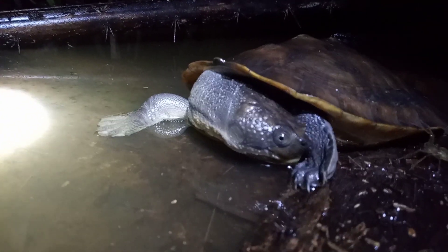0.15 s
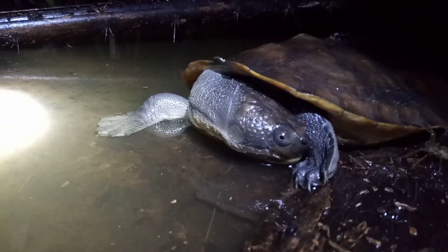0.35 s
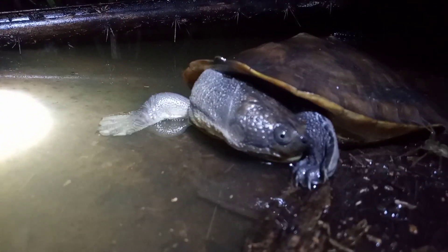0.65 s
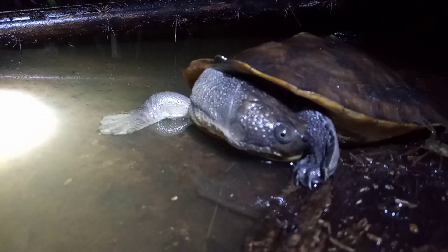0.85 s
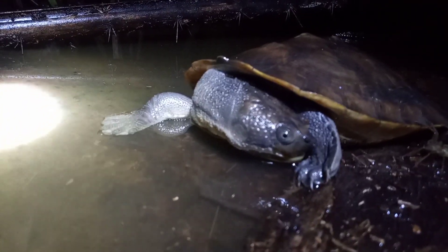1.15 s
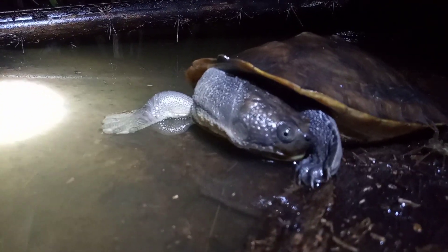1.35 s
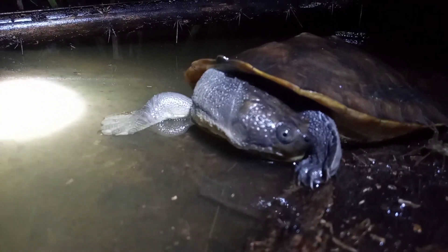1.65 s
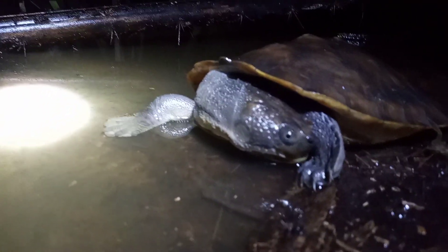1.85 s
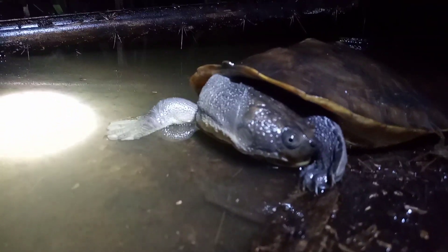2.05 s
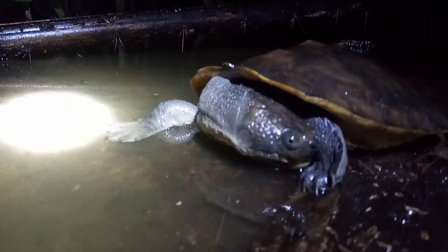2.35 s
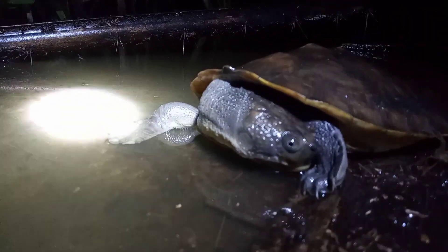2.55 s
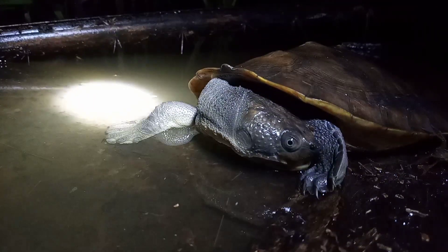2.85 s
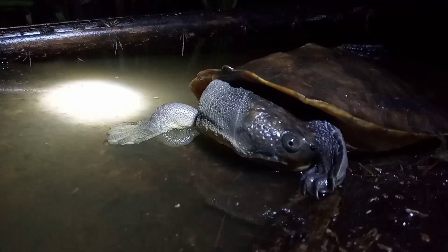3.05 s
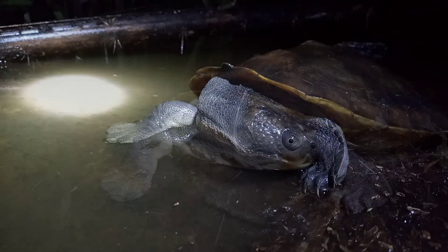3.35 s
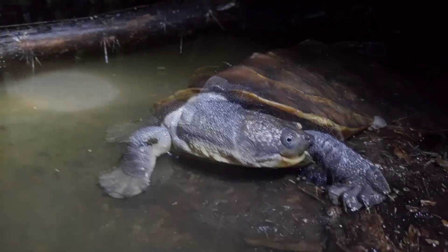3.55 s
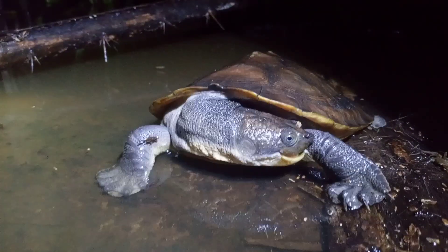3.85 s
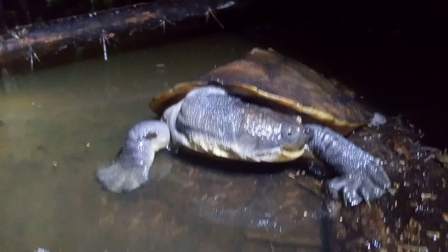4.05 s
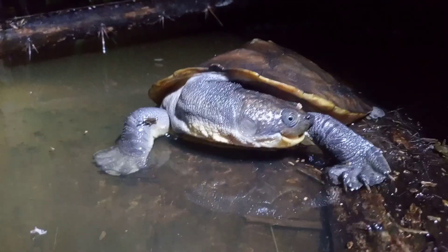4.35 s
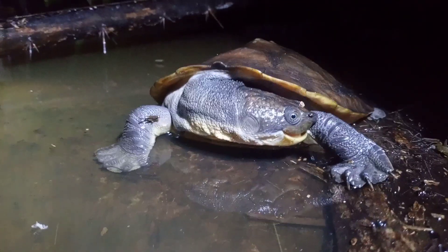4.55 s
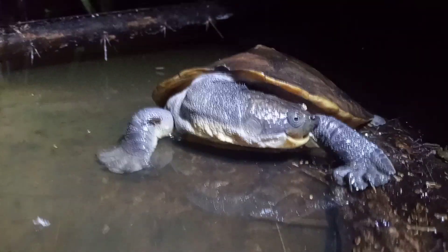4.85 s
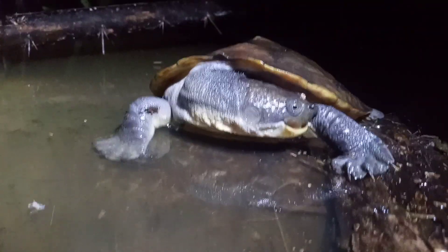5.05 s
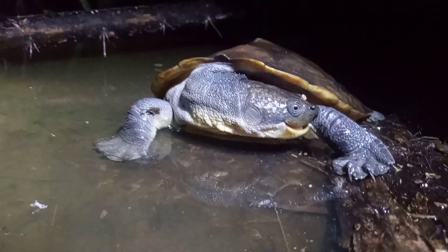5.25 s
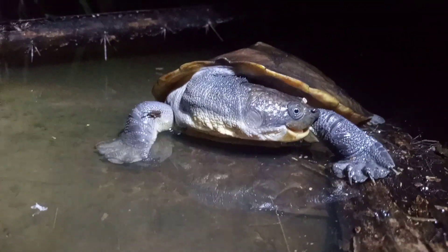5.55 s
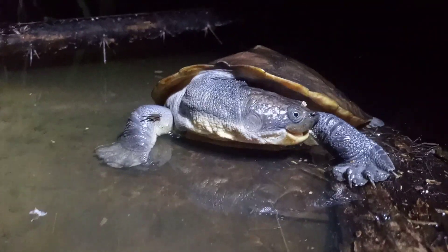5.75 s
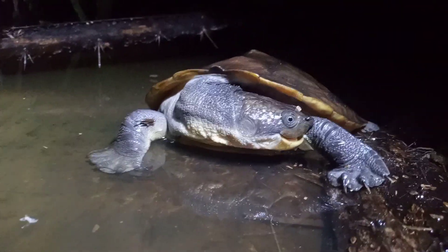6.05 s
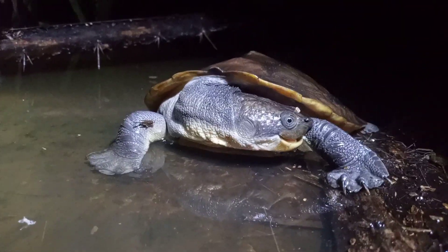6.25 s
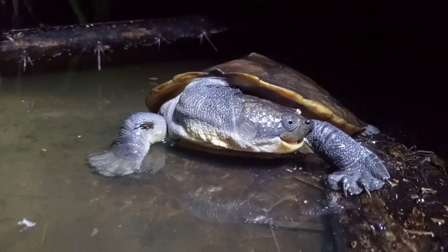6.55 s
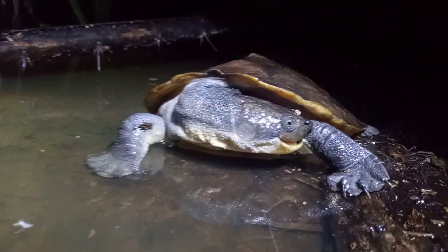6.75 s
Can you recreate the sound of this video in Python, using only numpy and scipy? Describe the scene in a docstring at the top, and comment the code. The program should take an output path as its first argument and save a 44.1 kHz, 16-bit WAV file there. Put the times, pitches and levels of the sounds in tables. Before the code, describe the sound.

A night swamp, heard mostly on the left. Crickets drone high and steadily over a murmur of far frogs and faint low air. A nearby frog gives short, gritty notes that tighten into whistles, in pairs and a cluster near the middle. Rough rasps answer, water plops and twigs tick. Past five seconds a close, loud snap cracks, followed by a burst of rasps. Trees echo softly around a handheld microphone.

```python
"""A swamp at night. A whistling frog, mostly to the left, is mid-note at the start: clicks and noise tighten
into a tone. Crickets drone, far frogs murmur, low air rumbles and a faint bush cricket buzz swells in bouts,
all shaped noise or tones. Trains of pips and chirps soon join, twigs tick as tiny noise bursts, water plops as
rising tones and sloshes as noise. Harsh pulsed rasps answer from half a second; from one second, scuffs of
noise and low thumps bump the camera. After five seconds one close snap ducks the camera's limiter; a much
weaker echo of it follows. Trees echo most sounds."""
import sys
import numpy as np
from scipy import signal
from scipy.fft import rfft, irfft, next_fast_len
from scipy.io import wavfile
from scipy.ndimage import uniform_filter1d, minimum_filter1d, map_coordinates

SR = 44100
rng = np.random.default_rng(int(sys.argv[2]) if len(sys.argv) > 2 else 0)


def log_audio(samples):
    """Write samples as a 16-bit WAV file to the path given in sys.argv[1]."""
    # one column per channel
    frames = np.atleast_2d(samples).T
    # limit to full scale, then quantise
    limited = np.clip(frames, -1, 1)
    pcm = np.round(limited * 32767).astype(np.int16)
    wavfile.write(sys.argv[1], SR, pcm)


N = 304290
T = np.arange(N) / SR  # time of each sample [s]

# Levels in the tables are starting points; each source may add its own gain.
# Whistling frogs: (start [s], length [s], top pitch, an octave under the whistle [Hz], whistle level [dB],
# rising body level [dB], grate level [dB], overtone level [dB], echo level [dB])
WHISTLE_NOTES = [(-.09, 0.15, 1323, -42, -44, -50.5, -69, 3),
                 (0.15, .15, 1318, -37.5, -43.5, -44.5, -56, 3.5),
                 (1.153, 0.14, 1305, -39.5, -48, -50.5, -66, 3),
                 (1.53, 0.17, 1368, -36.5, -48, -65, -70, -2),
                 (3.455, 0.13, 1243, -37, -40, -39.5, -47.5, 3.5),
                 (3.703, 0.15, 1282, -35, -35, -38, -44.5, 1),
                 (4.022, 0.12, 1251, -29, -36, -37, -41.5, -2.5),
                 (4.758, 0.13, 1374, -45.5, -41.5, -66, -53, 4),
                 (5.004, 0.16, 1326, -34, -41, -43.5, -52, 6.5),
                 (5.37, .165, 1328, -30.5, -39.5, -43, -51, 0),
                 (6.442, 0.12, 1337, -44.5, -63, -73, -72, 7), (6.756, 0.16, 1333, -40.5, -50, -55, -53, 6)]
# Partials around the whistle: (multiple of the base pitch, level [dB])
WHISTLE_PARTIALS = [(1, -3), (3, 0), (4, -2), (5, 6)]
# Colour of the grating start of a whistle note: (frequency [Hz], relative level [dB])
GRATE_COLOUR = [(500, -66), (850, -32), (1040, -5.5), (1240, 3.5), (1550, -2), (1750, -3), (1950, 3.5),
                (2250, -7.5), (2700, -29), (3300, -17), (4000, -28), (9000, -56.5)]
# Colour of the brighter part of its body: (frequency [Hz], relative level [dB])
BRIGHT_COLOUR = [(700, -33), (1050, -34), (1260, -7), (1600, -28), (2050, -11), (2400, 1.5), (2850, -5),
                 (3300, -11), (4200, -17.5), (4900, -12), (5500, -19), (6200, -5.5), (9000, -87)]
# Murmur of the far frogs: (time [s], level [dB])
FAR_FROG_LEVEL = [(0, -49.5), (.5, -48), (1.1, -49), (1.8, -50.5), (2.0, -51), (2.7, -50.5), (3.4, -52.5),
                  (4.0, -55.5), (4.6, -57.5), (5.6, -48), (6.15, -49), (6.4, -55), (6.75, -69)]
# Colour of that murmur: (frequency [Hz], relative level [dB])
FAR_FROG_COLOUR = [(1100, -31.5), (1450, -16), (1640, -9), (1850, -19.5), (2080, -4.5), (2250, 7.5),
                   (2480, 1), (2750, -3.5), (3050, -14.5), (3500, -13), (4200, -26), (4650, -31),
                   (5000, -17), (5500, -30), (7000, -61.5)]
# Cricket drone: (time [s], level [dB])
DRONE_LEVEL = [(0.0, -46), (2.86, -45.5), (3.57, -49), (4.28, -47), (5.48, -47), (5.82, -46), (6.9, -46)]
# Colour of the far crickets: (frequency [Hz], relative level [dB])
CRICKET_COLOUR = [(3000, -28.5), (5400, -32.5), (6100, -13.5), (6400, -4.5), (6650, -6.5), (7000, 2.5),
                  (7350, 0.5), (7800, -2.5), (8100, -2.5), (8800, -7.5), (9300, -4), (9800, -10),
                  (10600, -41), (14000, -85.5)]
# Left-right balance of the crickets: (frequency [Hz], right minus left [dB])
CRICKET_BALANCE = [(5000, -3.5), (6000, -19), (7600, -22.5), (8400, -30), (9300, -4.5), (11000, -22)]
# Night air: (time [s], level [dB])
AIR_LEVEL = [(0, -64), (1.3, -69), (2.8, -69), (3.4, -76), (4.4, -73.5), (6.9, -73)]
# Colour of the air: (frequency [Hz], relative level [dB])
AIR_COLOUR = [(20, -23), (45, -21.5), (68, -5), (99, 2.5), (125, 0), (150, -0.5), (230, -13.5), (600, -26),
              (850, -23.5), (1300, -25), (4000, -28), (12000, -73)]
# Bush cricket bouts: (full strength from [s], hold [s], level [dB], swell [s], fade [s])
BUZZ_BOUTS = [(0.104, 0.019, -58, 0.22, .07), (0.658, 0.079, -49.5, 0.18, 0.13),
              (1.617, 0.027, -42, 0.43, 0.13), (2.25, 0.093, -63.5, 0.63, 0.15),
              (2.656, 0.33, -38.5, 0.35, 0.91), (4.7, 1, -61, 0.56, 0.26), (5.904, 0.25, -35.5, 0.33, 0.17),
              (6.527, 0.33, -34.5, 0.17, .2)]
# Trilling frogs, then last a low, far layer of rasping frogs made the same way: (first call [s], stop [s],
# period [s], # call length [s], pips per second [1/s], middle pitch of a pip [Hz], level [dB])
TRILL_CALLS = [(0.09, 3.2, .343, 0.21, 60, 2290, -59.5), (3.87, 6.9, .362, 0.23, 38, 2250, -52.5),
               (0.3, 7.7, .35, 0.25, 70, 4755, -61.5), (0.5, 2.2, .41, 0.49, 27, 1640, -64.5)]
# Chirping crickets, a few runs of steady chirps, some overlapping: (first chirp [s], stop [s], period [s],
# middle pitch of a stroke [Hz], level [dB])
CRICKET_CHIRPS = [(.1, 3.4, 0.21, 7800, -50), (3.78, 6.1, 0.25, 7730, -50.5), (4.1, 5.1, 0.28, 7700, -50.5),
                  (5.24, 5.7, .235, 7600, -51)]
# Twigs and drips on litter: (time [s], pitch [Hz], level [dB])
LITTER_TICKS = [(0.137, 8900, -34), (.241, 3280, -38), (0.561, 2530, -31.5), (0.611, 11000, -41.5),
                (0.983, 3950, -32), (1.18, 14600, -30.5), (1.67, 5610, -34.5), (2.44, 7000, -32),
                (2.621, 11900, -30), (2.648, 4180, -29), (2.679, 4800, -30.5), (3.045, 2850, -37),
                (4.191, 10100, -34), (5.192, 13060, -30), (6.775, 10500, -27)]
# Colour of a tick: (multiple of its pitch, relative level [dB])
TICK_COLOUR = [(.1, -37), (.5, -10.5), (.9, -1), (1, 10.5), (1.1, -2), (1.7, -15), (4, -50)]
# A twig breaking close by: (time [s], peak level [dB])
TWIG_SNAPS = [(5.3051, 3), (5.3362, -22.5)]
# Colour of that snap: (frequency [Hz], relative level [dB])
SNAP_COLOUR = [(200, -40.5), (560, -14.5), (1100, -12), (1600, -28.5), (2200, -1.5), (2900, -1),
               (3600, -13.5), (5600, -12.5), (6150, 4), (6800, 2.5), (7600, -13.5), (9300, -14.5),
               (10500, -21), (13000, -32), (15500, -34)]
# Drops and bubbles: (time [s], starting pitch [Hz], level [dB], time to fall 60 dB [s])
WATER_PLOPS = [(.33, 417.5, -40, 0.11), (.472, 604, -53, 0.066), (.65, 486, -51.5, .08),
               (0.704, 530, -47.5, .11), (1.154, 437, -39.5, 0.041), (1.155, 624, -34.5, 0.029),
               (1.901, 493, -55.5, .2), (2.502, 692, -33, .07), (2.52, 600, -43, .08),
               (2.552, 425, -49, 0.061), (2.644, 635, -50, 0.045), (6.684, 850, -44.5, 0.053)]
# Water pushed aside: (time [s], level [dB], time to fall 60 dB [s])
WATER_SLOSHES = [(1.16, -59, 0.28), (1.879, -72, 0.62), (2.503, -48.5, 0.49), (2.64, -44.5, 0.083),
                 (2.99, -62.5, 0.6), (5.095, -68.5, 0.42), (5.5, -63.5, 0.54), (5.72, -68, 0.85),
                 (6.529, -63.5, 0.58), (6.7, -68, 0.25)]
# Colour of the spray: (frequency [Hz], relative level [dB])
SLOSH_COLOUR = [(150, -28), (400, -3), (700, 2), (1200, -5.5), (1800, 3), (3000, -8.5), (5000, -10),
                (12000, -45.5)]
# Rasping frogs: (start [s], length [s], final vocal sac pitch [Hz], level [dB], throat hum level [dB],
# opening croak relative to the rasp [dB])
RASP_NOTES = [(0.54, 0.16, 3480, -49, -56, 0), (0.856, 0.065, 2870, -46, -77, -8),
              (1.244, 0.1, 2810, -36.5, -45.5, -3), (1.771, 0.11, 3450, -49, -56, 0),
              (2.66, 0.085, 2730, -34.5, -43, -15), (2.979, 0.035, 2800, -45, -66, -8),
              (5.657, 0.068, 2880, -28.5, -61, 3.5), (5.714, 0.046, 3020, -31.5, -62, -7),
              (5.804, 0.099, 2870, -30, -49.5, 1), (6.051, 0.31, 3010, -51.5, -65, -1),
              (6.501, 0.094, 2750, -36, -48, -9)]
# Colour of the opening croak: (frequency [Hz], relative level [dB])
CROAK_COLOUR = [(600, -27), (1150, -33), (1400, 7), (1700, 10), (2500, 6.5), (3200, 6), (5000, -44),
                (12000, -82)]
# Colour of the rasp that follows: (frequency [Hz], relative level [dB])
RASP_COLOUR = [(600, -36), (1350, -28.5), (1650, -5), (1900, -10.5), (2200, -5.5), (2450, -4.5),
               (2700, -1.5), (3000, 1), (3270, 4), (3550, -10.5), (3800, -4), (4300, -15.5), (5600, -17.5),
               (7500, -15.5), (11000, -10), (16000, -18)]
# Soft knocks on the camera body: (start [s], scuff length [s], scuff level [dB], thump level [dB])
CAMERA_BUMPS = [(1.033, 0.16, -69, -65), (4.147, 0.027, -53, -52), (4.296, 0.019, -52, -60),
                (4.539, 0.029, -59.5, -69), (4.745, 0.024, -58.5, -53), (4.932, 0.039, -49, -40),
                (5.091, 0.044, -59, -57), (5.512, 0.06, -59, -48), (5.937, 0.039, -63, -55),
                (6.289, 0.026, -64, -53.5)]
# Colour of the scuff: (frequency [Hz], relative level [dB])
SCUFF_COLOUR = [(30, -41), (90, 10), (160, -0.5), (230, -14), (330, -0.5), (480, -19), (1200, -59),
                (4000, -76)]
# Long echo among the trees: (frequency [Hz], time to fall 60 dB [s])
TREE_ECHO = [(200, 0.6), (1200, 0.18), (2600, 0.55), (6000, 0.93), (15000, 0.26)]

# Whistle: where in the note its pitch peaks [share], and how fast it sags to either side
ARCH_TOP, ARCH_SAG = 0.66, 0.3003
# Vocal sac resonance: start and end [share of whistle pitch], rise [share of note], width [Hz]
BODY_START, BODY_END, BODY_RISE, BODY_WIDTH_HZ = 0.736, 0.92, 0.55, 420
PITCH_DB = -22  # base tone, relative to the whistle an octave above
CHORUS_SWAY_DB = 3  # slow sway of the far frogs
DRONE_DB = 3  # gain added to the cricket drone
THIN_HZ, THIN_DB = 6425, -16.5  # one thin, lower cricket note, and its level relative to the far crickets
SWELL_DB, LULL_DB = 21.5, -71.5  # depth of a swell or fade; faint buzz between bouts
# Pips: scatter of rate, fall and scatter of pitch [shares]; octave overtone [dB]
PIP_UNEVEN, PIP_FALL, PIP_ROUGH, OCTAVE_DB = 0.284, 0.087, 0.0245, -28
CHIRP_S, STROKES_PER_S = 0.087, 70.3  # chirp length; wing strokes each second
# Rasp resonance: start [share of its final pitch], width [Hz], level [dB]
SAC_START, SAC_WIDTH_HZ, SAC_DB = 0.75, 495, -8.5
HUM_HZ, HUM_WIDTH_HZ, HUM_T60 = 1650, 93, 0.49  # throat hum; last is time to fall 60 dB [s]
THUMP_HZ, THUMP_T60 = 94, 0.11  # the camera's low sway in the hand; time to fall 60 dB [s]
NEAR_LAG_S, FAR_LAG_S = 0.00127, 0.00063  # delay of the direct sound on the left
TOP_HZ = 15950  # nothing is kept from here up


def amp(db):
    """Turn decibels into a gain."""
    return 10 ** (np.asarray(db) / 20)


def unit(x):
    """Scale a sound to an average strength (rms) of 1."""
    return x / np.sqrt(np.mean(x ** 2) + 1e-20)


def along(points, hz):
    """Read (frequency, value) points on a log frequency axis."""
    f, v = np.transpose(points)
    return np.interp(np.log(hz + 1), np.log(f + 1), v)


def curves(rows):
    """Join timed points into one value per sample, for each column after the time."""
    s, *cols = np.transpose(rows)
    return [np.interp(T, s, c) for c in cols]


def wobble(rate, size=N):
    """Make a smooth random curve through this many random points a second."""
    points = rng.standard_normal(int(size * rate / SR) + 4)
    return map_coordinates(points, [np.arange(size) * rate / SR])


def filtered(x, gain):
    """Multiply a sound by a gain that depends on frequency."""
    n = x.shape[-1]
    m = next_fast_len(n + 8192)
    return irfft(rfft(x, m) * gain(np.fft.rfftfreq(m, 1 / SR)), m)[..., :n]


def coloured(x, spectrum):
    """Give a sound this tone colour, at rms 1, with a filter that rings only after its input."""
    order = 2048
    cepstrum = irfft(np.log(amp(along(spectrum, np.fft.rfftfreq(order, 1 / SR)))))
    # folding the log spectrum's transform forward leaves no ringing ahead of the sound
    cepstrum[1:order // 2] *= 2
    cepstrum[order // 2 + 1:] = 0
    ring = irfft(np.exp(rfft(cepstrum)))
    if x.ndim > 1:
        ring = np.atleast_2d(ring)
    return unit(signal.fftconvolve(x, ring, axes=-1)[..., :x.shape[-1]])


def patchy(x, patchy_db):
    """Give each frequency band its own slow swells and lulls."""
    bands = signal.stft(x, nperseg=512)[2]
    field = uniform_filter1d(rng.standard_normal(bands.shape), size=5, axis=0)
    field = uniform_filter1d(uniform_filter1d(field, size=22, axis=1), size=12, axis=1)
    return unit(signal.istft(bands * amp(patchy_db * unit(field)), nperseg=512)[1][:N])


def gliding(x, hz, width_hz):
    """Ring a sound through a resonance whose centre can move, at rms 1."""
    turn = np.exp(2j * np.pi * np.cumsum(hz) / SR)
    b, a = signal.butter(3, width_hz / 2, fs=SR)
    # shift the centre to zero, keep what is near it, and shift it back
    return unit((signal.lfilter(b, a, x / turn) * turn).real)


def add(track, s, sound):
    """Mix a sound into a track from time s on."""
    i = round(s * SR)
    part = sound[max(-i, 0):max(N - i, 0)]
    track[max(i, 0):][:len(part)] += part


def swell(u, rise, fall):
    """Fade smoothly in and out over u = 0..1; rise and fall are shares of that span."""
    fade_in = np.sin(np.pi / 2 * np.clip(u / rise, 0, 1))
    fade_out = np.sin(np.pi / 2 * np.clip((1 - u) / fall, 0, 1))
    return fade_in * fade_out


def among_trees(x, wet_db, right_db, lag_s=FAR_LAG_S):
    """Send a sound left and right, direct sound slightly later on the left, with quick scatter and a long tree echo."""
    echoes = rng.standard_normal((2, SR)) * amp(2 * wobble(400, size=SR))
    hz, t, bands = signal.stft(echoes, SR, nperseg=256)
    long_echo = amp(-60 * t / along(TREE_ECHO, hz)[:, None])  # from the trunks
    quick_scatter = 1.38 * amp(-60 * t / 0.033)  # from reeds and bank
    tail = signal.istft(bands * (long_echo + quick_scatter), SR, nperseg=256)[1]
    paths = amp(wet_db) * tail / np.linalg.norm(tail[0])
    paths[[0, 1], [round(lag_s * SR), 0]] += 1  # direct sound: left after the lag, right at once
    heard = signal.fftconvolve(x[None], paths, axes=1)[:, :N]
    return heard * amp([[0], [right_db]]) / np.sqrt(1 + amp(wet_db) ** 2)


def pulses(rate, jitter, breath):
    """Make uneven clicks of the vocal cords, each followed by a puff of noise."""
    phase = np.cumsum(rate * np.exp(jitter * wobble(200, size=len(rate)))) / SR
    clicks = np.diff(np.floor(phase), prepend=-1) * amp(1 * rng.standard_normal(len(rate)))
    puffs = np.exp(-4 * (phase % 1)) * rng.standard_normal(len(rate))
    return unit(clicks) + breath * unit(puffs)


def crack(spectrum, burst, ring_db, ring_t60):
    """Make a brief brittle noise burst with a short ring, at peak 1; times in seconds."""
    t = np.arange(SR // 20) / SR
    shape = t / burst * np.exp(1 / 2 - (t / burst) ** 2 / 2) + amp(ring_db - 60 * t / ring_t60)
    x = coloured(rng.standard_normal(len(t)) * shape, spectrum)
    return x / np.abs(x).max()


def whistling_frogs():
    """Quickening clicks grate through a vocal sac whose resonance rises, then give way to a firm, arching tone."""
    out = np.zeros((2, N))
    for s, length, pitch_hz, whistle_db, body_db, grate_db, overtone_db, echo_db in WHISTLE_NOTES:
        u = np.linspace(0, 1, int(length * SR))  # progress through the note
        rate = 170 + 110 * u  # clicks per second
        cords = pulses(rate, jitter=0.03, breath=0.25)
        # the throat spreads each click over most of a cycle
        cords = filtered(cords, lambda hz: np.exp(-1j * (hz / 640) ** 2 / (1 + hz / 9000)))

        sac_share = BODY_START + (BODY_END - BODY_START) * np.minimum(u / BODY_RISE, 1)
        body = gliding(cords, 2 * pitch_hz * sac_share, BODY_WIDTH_HZ) * swell(u / 0.74, 0.67, 0.54)
        grate = coloured(cords, GRATE_COLOUR) * swell(u / 0.72, 0.41, 0.38)
        bright = coloured(cords, BRIGHT_COLOUR) * swell((u - 0.2) / 0.6, 0.8, 0.37)

        arch = 1 - ARCH_SAG * np.maximum(u - ARCH_TOP, -0.33) ** 2
        glide = arch + 0.003 * wobble(160, size=len(u))
        phase = 2 * np.pi * np.cumsum(pitch_hz * glide) / SR
        # the pulses chop the young tone, less and less as the note tightens
        chop = 1 + (1 - u) ** 2 * np.cos(2 * np.pi * np.cumsum(rate) / SR)
        flutter = 0.35 * wobble(190, size=len(u))
        # weak notes never quite lock, and stay buzzy
        loose = np.clip((-26 - whistle_db) / 12, 0.2, 0.8)
        tone = np.sin(2 * (phase + loose * flutter)) + amp(PITCH_DB) * np.sin(phase)
        unsteady = amp((1 + 3 * loose) * wobble(170, size=len(u)))
        whistle = unit(tone * chop * unsteady) * swell(u, 0.65, 0.14) ** 2
        partials = sum(amp(db) * np.sin(round(k) * (phase + flutter)) for k, db in WHISTLE_PARTIALS)
        overtones = unit(partials) * chop * swell(u, 0.72, 0.3) ** 4

        note, edge = np.zeros(N), np.zeros(N)
        full_body = body + amp(-7.5) * bright
        add(note, s, amp(grate_db) * grate + amp(body_db) * full_body + amp(whistle_db) * whistle)
        add(edge, s, amp(overtone_db) * overtones)
        out += among_trees(note, wet_db=echo_db, right_db=-12.5, lag_s=NEAR_LAG_S)
        out += among_trees(edge, wet_db=echo_db - 3, right_db=-13.0, lag_s=NEAR_LAG_S)
    return out


def far_frogs():
    """Waver a band of patchy noise, like many distant calls overlapping into a murmur."""
    level_db, = curves(FAR_FROG_LEVEL)
    calls = patchy(rng.standard_normal(N), patchy_db=3) * amp(4.5 * wobble(70))
    murmur = among_trees(coloured(calls, FAR_FROG_COLOUR), wet_db=4.0, right_db=-22.5)
    return amp(level_db - 2.5 + CHORUS_SWAY_DB * wobble(7.5)) * murmur


def crickets():
    """Pulse twelve nearer crickets out of step over noise that stands for countless far ones."""
    level_db, = curves(DRONE_LEVEL)
    near = np.zeros(N)
    for pitch, speed, start, pace in rng.random((12, 4)):
        stroke_turns = (35 + 45 * speed) * T + start + 0.33 * wobble(6)
        strokes = np.maximum(np.sin(2 * np.pi * stroke_turns), 0)
        chirps = np.sin(np.pi * ((3 + 3 * pace) * T + start + 0.2 * wobble(2))) ** 4
        hz = 7000 + 620 * pitch + 90 * strokes + 50 * wobble(5)
        near += chirps * strokes * np.sin(2 * np.pi * np.cumsum(hz) / SR)
    thin = gliding(rng.standard_normal(N), np.full(N, THIN_HZ), width_hz=90)
    far = coloured(rng.standard_normal((2, N)), CRICKET_COLOUR)
    drone = far + 0.75 * unit(near) + amp(THIN_DB) * thin
    drone = filtered(drone, lambda hz: amp([0 * hz, along(CRICKET_BALANCE, hz)]))
    return amp(level_db + DRONE_DB + 0.35 * wobble(11)) * drone


def night_air():
    """Shape noise into a low, uneven rumble with a faint hiss above it."""
    level_db, = curves(AIR_LEVEL)
    shared = patchy(rng.standard_normal(N), patchy_db=2.0)  # the same on both sides
    air = coloured(shared + 1.0 * rng.standard_normal((2, N)), AIR_COLOUR)
    return amp(level_db + 3.5 + 2.63 * wobble(16)) * air * amp([[0], [-10]])


def bush_cricket():
    """Swell, hold and fade very high noise in bouts, throbbing with the wing strokes."""
    power = amp(LULL_DB) ** 2
    for s, hold, db, swell_s, fade_s in BUZZ_BOUTS:
        away = np.maximum(s - T, 0) / swell_s + np.maximum(T - s - hold, 0) / fade_s
        power = power + amp(db - SWELL_DB * away ** 2) ** 2
    wings = np.sin(2 * np.pi * np.cumsum(31 + 2.77 * wobble(3.1)) / SR)
    # (frequency [Hz], relative level [dB])
    buzz_colour = [(12500, -37.0), (14000, -20.5), (14700, 1.5), (15300, -1.0), (16000, -2.0)]
    buzz = coloured(rng.standard_normal((2, N)), buzz_colour)
    return np.sqrt(power) * amp(2.4 * wings) * buzz * amp([[0], [-8]])


def trilling_frogs():
    """Repeat trains of quick, rough pips in steady time, each pip falling in pitch, with an octave overtone."""
    out = np.zeros(N)
    for first, stop, period, length, pips_per_s, pitch_hz, db in TRILL_CALLS:
        u = np.linspace(0, 1, int(length * SR))
        for s in np.arange(first, stop, period):
            rate = pips_per_s * np.exp(PIP_UNEVEN * wobble(23.1, size=len(u)))
            pip = (np.cumsum(rate) / SR) % 1  # progress through each pip
            glide = 1 + PIP_FALL * (1 / 2 - pip) + PIP_ROUGH * wobble(399.6, size=len(u))
            phase = 2 * np.pi * np.cumsum(pitch_hz * glide) / SR
            tone = np.sin(phase) + amp(OCTAVE_DB) * np.sin(2 * phase)
            voice = unit(np.sin(np.pi * pip) ** 2 * tone)
            add(out, s, amp(db + 2 * rng.standard_normal()) * voice * swell(u, 0.036, 0.33))
    return among_trees(out, wet_db=7, right_db=-18.5)


def chirping_crickets():
    """Repeat short chirps in steady runs, some overlapping, each chirp made of wing strokes that sag in pitch."""
    out = np.zeros(N)
    u = np.linspace(0, 1, int(CHIRP_S * SR))
    for first, stop, period, pitch_hz, db in CRICKET_CHIRPS:
        for s in np.arange(first, stop, period):
            stroke = (STROKES_PER_S * CHIRP_S * u + rng.random()) % 1  # progress through each stroke
            hz = pitch_hz + 120 * (1 / 2 - stroke) + 20 * wobble(90, size=len(u))
            phase = 2 * np.pi * np.cumsum(hz) / SR
            chirp = unit(np.sin(np.pi * stroke) * np.sin(phase)) * swell(u, 0.22, 0.24)
            add(out, s, amp(db + 2 * rng.standard_normal()) * chirp)
    return among_trees(out, wet_db=-4.5, right_db=-12.5)


def twigs():
    """Burst noise into small dry ticks in the litter, and a sharp snap close by on the left."""
    small, close = np.zeros(N), np.zeros(N)
    for s, pitch_hz, db in LITTER_TICKS:
        spectrum = [(k * pitch_hz, level) for k, level in TICK_COLOUR]
        add(small, s, amp(db + 1) * crack(spectrum, burst=0.0004, ring_db=-14, ring_t60=0.018))
    for s, db in TWIG_SNAPS:
        add(close, s, amp(db) * crack(SNAP_COLOUR, burst=0.0006, ring_db=-13, ring_t60=0.02))
    ticks = among_trees(small, wet_db=-9, right_db=-9)
    return ticks + among_trees(close, wet_db=-23.5, right_db=-26.0)


def water():
    """Plop bubbles as short rings of rising pitch; slosh as a fading patter of spray."""
    bubbles, splashes = np.zeros(N), np.zeros(N)
    t = np.arange(SR // 2) / SR
    for s, pitch_hz, db, t60 in WATER_PLOPS:
        ring = np.sin(2 * np.pi * pitch_hz * t * (1 + 0.25 * t))
        add(bubbles, s, amp(db - 60 * t / t60) * (1 - np.exp(-t / 0.0029)) * ring)
    for s, db, t60 in WATER_SLOSHES:
        patter = amp(2.7 * wobble(378.7, size=len(t)))
        spray = coloured(rng.standard_normal(len(t)) * patter, SLOSH_COLOUR)
        add(splashes, s, amp(db + 10.5 - 60 * t / t60) * (1 - np.exp(-t / 0.003)) * spray)
    plops = among_trees(bubbles, wet_db=-9, right_db=-12)
    return plops + among_trees(splashes, wet_db=2.0, right_db=-8.5, lag_s=NEAR_LAG_S)


def rasping_frogs():
    """Send coarse, irregular pulses through a rising sac resonance; a low hum in the throat lingers."""
    out = np.zeros(N)
    t = np.arange(SR // 2) / SR
    for s, length, sac_hz, db, hum_db, croak_db in RASP_NOTES:
        u = np.linspace(0, 1, int(length * SR))
        cords = pulses(np.full(len(u), 135.0), jitter=0.2, breath=0.35)
        cords = cords * amp(1.5 * wobble(110, size=len(u)))
        sac_share = SAC_START + (1 - SAC_START) * np.minimum(u / 0.29, 1)
        sac = gliding(cords, sac_hz * sac_share, SAC_WIDTH_HZ)
        opening = np.clip(u / 0.26, 0, 1) ** 2  # crossfade from croak to rasp
        croak = (1 - opening) * amp(croak_db) * coloured(cords, CROAK_COLOUR)
        rasp = croak + opening * 0.8 * coloured(cords, RASP_COLOUR) + amp(SAC_DB) * sac
        # faint callers are far off, and the air takes their treble
        loss_db = min(db + 39.0, 0)
        rasp = filtered(rasp, lambda hz: amp(loss_db * (hz / 9000) ** 2))
        add(out, s, amp(db + 1.0) * rasp * swell(u, 0.34, 0.38))

        hum = gliding(rng.standard_normal(len(t)), np.full(len(t), HUM_HZ), HUM_WIDTH_HZ)
        hum_gain = amp(hum_db - 60 * np.maximum(t - length / 2, 0) / HUM_T60)
        add(out, s, hum_gain * np.minimum(t / 0.033, 1) ** 2 * hum)
    return among_trees(out, wet_db=6, right_db=-13, lag_s=NEAR_LAG_S)


def handling():
    """Shift fingers on the camera: a dull scuff of noise over a low, fading thump."""
    out = np.zeros(N)
    t = np.arange(SR // 4) / SR
    for s, length, scuff_db, thump_db in CAMERA_BUMPS:
        u = np.linspace(0, 1, int(length * SR))
        scuff = coloured(rng.standard_normal(len(u)), SCUFF_COLOUR) * swell(u, 0.21, 0.1)
        add(out, s, amp(scuff_db) * scuff)
        thump = (1 - np.exp(-t / 0.009)) * np.sin(2 * np.pi * THUMP_HZ * t)
        add(out, s, amp(thump_db + 8.5 - 60 * t / THUMP_T60) * thump)
    return among_trees(out, wet_db=-10, right_db=-17)


def scene():
    """Add up all the swamp's sounds around the camera."""
    swamp = whistling_frogs() + far_frogs() + crickets() + night_air() + bush_cricket()
    swamp = swamp + trilling_frogs() + chirping_crickets() + twigs() + water()
    return swamp + rasping_frogs() + handling()


def record(dry):
    """Duck both sides at a loud peak, recover steadily, and cut everything from the top frequency up."""
    peak = np.abs(dry).max(axis=0)
    over_db = np.maximum(20 * np.log10(peak / amp(-4.5) + 1e-9), 0)
    recovery_db = 70 * T  # recovers 70 dB a second
    duck_db = np.maximum.accumulate(over_db + recovery_db) - recovery_db
    gain = uniform_filter1d(minimum_filter1d(amp(-duck_db), size=64), size=64)
    return filtered(dry * gain, lambda hz: hz < TOP_HZ)


dry = scene()
out = record(dry)
log_audio(out)
```